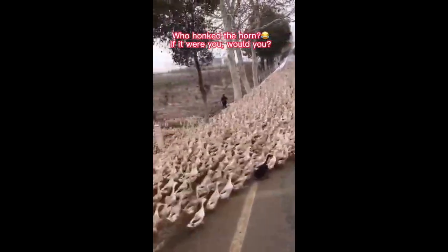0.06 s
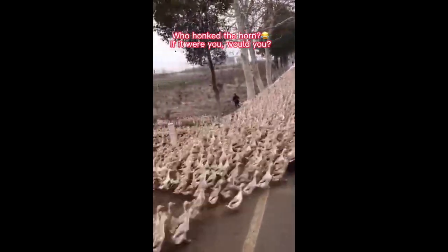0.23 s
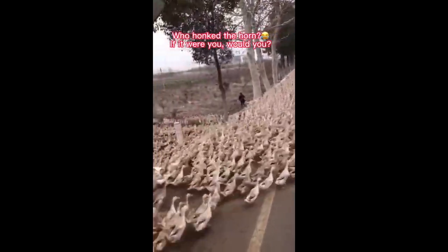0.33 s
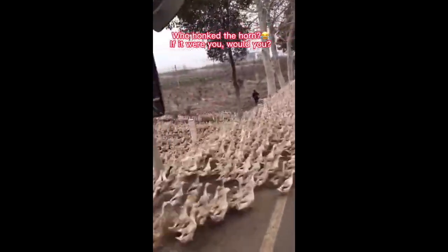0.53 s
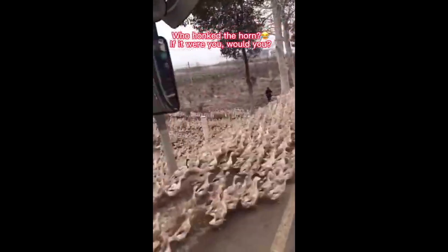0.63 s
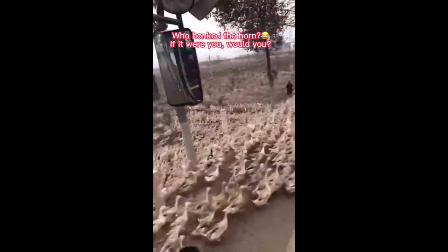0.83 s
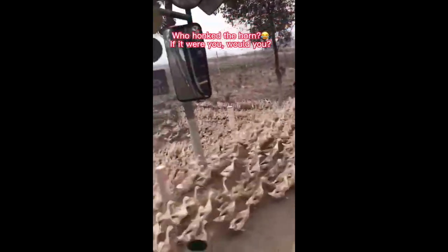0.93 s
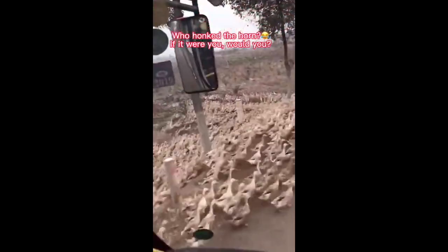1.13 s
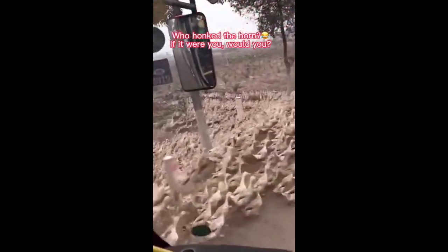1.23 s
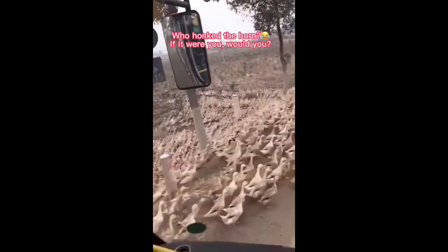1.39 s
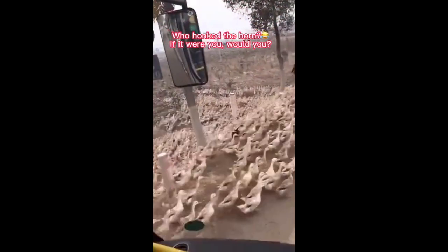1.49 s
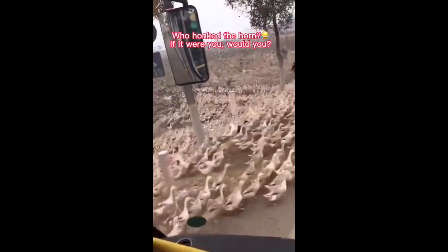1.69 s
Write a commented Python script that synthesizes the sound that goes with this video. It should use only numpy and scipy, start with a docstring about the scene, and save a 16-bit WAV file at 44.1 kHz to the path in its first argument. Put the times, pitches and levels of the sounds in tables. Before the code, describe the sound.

A truck's two-tone horn blasts once, loud and rasping, heard from the cab over quiet engine rumble. Its chord echoes from trees and fields, fades, then the sound briefly drops out before low engine noise returns.

```python
"""Truck horn on a country road

From the cab, a truck's two-tone horn gives one blast: two stacks of rasping overtones, with hiss and rough bursts.
Trees and fields send the chord back for almost a second, each overtone fading in and out on its own.
Uneven engine orders and shaped road noise run underneath. Near the end the sound drops out briefly,
leaving a faint rumble, and returns without the echo, with the engine and road noise changed in colour."""
import sys
import numpy as np
from scipy import signal
from scipy.fft import rfft, irfft, next_fast_len
from scipy.io import wavfile

SR = 44100
rng = np.random.default_rng(int(sys.argv[2]) if len(sys.argv) > 2 else 0)


def inscribe(sig):
    """Save sig as 16-bit PCM at rate SR to the path in sys.argv[1].

    A 1-D sig is mono; a 2-D sig holds one channel per row.
    Samples are clipped to [-1, 1] before scaling.
    """
    pcm = np.round(np.clip(np.atleast_2d(sig).T, -1, 1) * 32767)
    wavfile.write(sys.argv[1], SR, pcm.astype(np.int16))


N = 77175
T = np.arange(N) / SR  # s
EDGE_HZ = 15650  # upper band limit

# Road and cab noise before and after the dropout: pitch_hz, relative level_db (per Hz)
ROAD_COLOUR = [(25, -5.5), (45, -2.5), (85, 3.5), (150, -2.5), (300, -8.5), (600, -16.5), (1200, -19.5),
               (2800, -27), (6000, -36), (7500, -52), (15000, -49.5)]
LATE_ROAD_COLOUR = [(25, -20.5), (50, -5.5), (90, -5.5), (190, -16.5), (300, -9), (530, -15), (800, -21.5),
                    (1400, -19), (2300, -25), (3000, -31.5), (6000, -39), (7500, -50.5), (15000, -64)]
# Road noise level up to the dropout: start_s, level_db
ROAD_LEVEL = [(0, -63.5), (.2, -61), (.7, -58.5), (.9, -56), (1.38, -58)]
LATE_ROAD_DB = -58

# Engine orders: multiple of the firing rate, level_db before the dropout ends, level_db after it
ENGINE_ORDERS = [(1, -57.5, -83), (2, -74, -57.5), (3, -73.5, -62), (4.3, -66.5, -66.5)]
# Overall engine level, added to every order: start_s, level_db
ENGINE_LEVEL = [(0, -17.5), (.65, -7.5), (.85, -3.5), (1.25, 4.5), (1.45, -12.5), (1.75, 2.5)]
FIRING_HZ = 30.8  # mean rate

# Air noise of the blast: pitch_hz, relative level_db (per Hz)
AIR_COLOUR = [(100, -14.5), (250, 5.5), (400, -7), (640, -6.5), (1100, 5), (2000, -1.5), (2700, -13.5),
              (3800, -8), (5600, -31), (7300, -28.5), (8500, -37), (15000, -44.5)]
AIR_DB, EARLY_AIR_DB = -59, 8.5  # EARLY_AIR_DB is added once, and once more until SETTLE_S

LOW_HZ, HIGH_HZ = 419.25, 498.35  # the two horns
LOW_DB, HIGH_DB = -28, -24  # base levels, to which the overtone tables add
# Overtones of each horn: multiple of its pitch, level_db
LOW_OVERTONES = [(1, -17), (2, -4), (3, -15.5), (4, 1.5), (5, -6.5), (6, -18.5), (7, -22.5), (8, -21),
                 (9, -21.5), (10, -29), (11, -22), (12, -27.5), (13, -32), (14, -38), (15, -35.5),
                 (16, -54.5), (17, -39.5), (18, -51)]
HIGH_OVERTONES = [(1, -6), (2, 1.5), (3, -7), (4, -6), (5, -21), (6, -21), (7, -20.5), (8, -20.5), (9, -24),
                  (10, -30), (11, -36), (12, -41), (13, -45.5), (14, -50), (15, -45)]
# Weak overtones above those: pitch_hz, level_db
TOP_OVERTONES = [(7900, -83.5), (9000, -76.5), (10300, -82.5), (11300, -91.5), (12800, -86.5),
                 (14200, -88.5), (15500, -99)]
TOP_UNEVEN_DB = 6  # random spread of their levels
# An overtone swells or sinks where its paths add or cancel: middle_s, half_length_s, pitch_hz, level_db
SWELLS = [(.23, 0.027, 419, 17), (0.532, 0.017, 419, 11.5), (1.157, 0.093, 419, 9),
          (0.647, 0.013, 838, -13), (1, 0.24, 838, 3), (.29, 0.057, 997, 3.5), (0.66, 0.025, 997, 3.5),
          (0.766, 0.024, 997, -10), (.845, 0.042, 997, 8), (1.154, 0.072, 997, -7.5),
          (1.8, 0.13, 1257, 13.5), (0.91, 0.0089, 1700, 2), (0.83, 0.0087, 960, 5),
          (1.04, 0.011, 1495, 6.5), (1.3, .09, 1800, 9), (0.978, 0.068, 1677, 7), (1.022, 0.16, 1677, -11),
          (1.28, .08, 710, 7), (.283, 0.011, 1993, -24.5), (1.1, 0.21, 2096, -13), (.255, 0.037, 2500, 11),
          (0.86, 0.045, 2500, 13.5), (0.95, 0.07, 3488, 6.5), (1.17, 0.25, 3488, 9.5),
          (1.2, 0.15, 5005, 10)]
SAME_OVERTONE_HZ = 30  # a swell acts on overtones closer than this
ON_S, OFF_S, SETTLE_S = 0.225, 0.528, 0.29  # middle of rise, of fall; both horns rasp more until SETTLE_S
ATTACK_S, RELEASE_S = 0.004, 0.0068  # width settings of the smooth steps
LOW_LAG_S, TREBLE_LAG_S_PER_KHZ = 0.0098, 0.0041
SCOOP_HZ, SCOOP_S = 3.2, 0.022  # pitch starts this far below, and settles with this time constant
WAVER_HZ, WAVER_RATE_HZ = 0.49, 27  # pitch tremble: scale and speed
RASP_DB, EARLY_RASP_DB, RASP_WIDTH_HZ = -26, -16, 45  # against each overtone

SLAP_DELAY_S = 0.071  # first reflection, from the roadside trees
# Its strength against the blast: pitch_hz, level_db
SLAP_COLOUR = [(420, -13.5), (500, -33), (1000, -25), (1500, -27), (1680, -11), (2100, -25), (2500, -3),
               (3200, -2), (4300, -18.5), (6000, -9), (9000, -9.5), (14000, -11.5)]
# Echo of each horn against its blast: start_s, level_db
LOW_ECHO = [(.25, -19.5), (.48, -7.5), (.57, 2.5), (0.651, -0.5), (.77, 0.5), (.86, -3.5), (0.941, 2.5),
            (1.001, -9.5), (1.07, -9), (1.16, -16.5), (1.26, -17.5), (1.38, -22)]
HIGH_ECHO = [(.25, -17), (.48, -1), (.56, -7), (0.621, -3), (.71, -3), (.77, -6.5), (.85, -9),
             (0.979, -8.5), (1.04, -10.5), (1.12, -16), (1.259, -18), (1.38, -25)]
# Colour of the echo: pitch_hz, level_db
ECHO_COLOUR = [(420, -6.5), (500, -15), (840, -10), (1000, -14.5), (1260, -6.5), (1500, -4.5), (1680, -9),
               (2050, -10), (2500, -13.5), (3000, -9), (3500, -5.5), (4500, -12), (6000, -2.5),
               (14000, -4.5)]
ECHO_DULLING_DB_PER_KHZ_S, DULL_FROM_HZ = 9, 2650
FADING_DB, DRIFT_RAD, FADING_HZ = 1.74, 0.31, 21  # depth scales at 1 kHz, and speed
SCATTER_DB, SCATTER_HZ = -10.5, 24

# Rough bursts as the horns catch, settle and let go: middle_s, half_length_s, level_db
BURSTS = [(0.241, 0.021, -40), (0.32, 0.014, -44.5), (0.54, .025, -52)]
# Their colour: pitch_hz, relative level_db (per Hz)
BURST_COLOUR = [(100, -12), (230, -1.5), (400, 0.5), (640, -2.5), (1100, -5.5), (1500, -7), (2500, -7.5),
                (4000, -22.5), (5500, -32.5), (7500, -29), (10000, -41), (15000, -46)]

GAP_FROM_S, GAP_TO_S, GAP_FADE_S, GAP_DB = 1.376, 1.467, 0.0095, -33  # GAP_DB: gain of the rumble left


def amp(db):
    """Decibels to gain."""
    return 10 ** (np.asarray(db) / 20)


def unit(x):
    """Scales to an rms of one."""
    return x / np.sqrt(np.mean(abs(x) ** 2) + 1e-20)


def curve(points):
    """Joins (s, value) points by straight lines."""
    return np.interp(T, *np.transpose(points))


def read(points, hz):
    """Reads a spectrum on a log-frequency axis."""
    pitch_hz, value = np.transpose(points)
    return np.interp(np.log(hz + 1), np.log(pitch_hz + 1), value)


def step(at_s, width_s):
    """Smooth rise from 0 to 1, halfway at at_s."""
    return 0.5 + 0.5 * np.tanh((T - at_s) / (2 * width_s))


def bump(middle_s, half_s):
    """Bell-shaped swell with a peak of 1."""
    return np.exp(-((T - middle_s) / half_s) ** 2)


def noise(colour):
    """Random noise of rms one, coloured by a spectrum table."""
    size = next_fast_len(N)
    gain = amp(read(colour, np.fft.rfftfreq(size, 1 / SR)))
    spectrum = rfft(rng.standard_normal(size)) * gain
    return unit(irfft(spectrum, size)[:N])


def wander(rate_hz):
    """Smooth complex chance of rms one, mostly slower than about twice rate_hz; both parts independent."""
    hz = np.fft.fftfreq(4096, 32 / SR)  # one point per 32 samples
    phase = 2j * np.pi * rng.random(len(hz))
    z = np.fft.ifft(np.exp(phase - 0.5 * (hz / rate_hz) ** 2))
    return unit(np.interp(np.arange(N) / 32, np.arange(len(z)), z))


def road():
    """Rumble and wash in the cab: broadband noise that changes colour after the dropout."""
    before = amp(curve(ROAD_LEVEL)) * noise(ROAD_COLOUR)
    after = amp(LATE_ROAD_DB) * noise(LATE_ROAD_COLOUR)
    return np.where(T < GAP_TO_S, before, after)


def engine():
    """Low, uneven orders of a slow-running engine, all following one wandering firing rate."""
    turns = np.cumsum(FIRING_HZ * (1 + 0.063 * wander(2.7).real)) / SR
    out = np.zeros(N)
    for order, before_db, after_db in ENGINE_ORDERS:
        level = amp(np.where(T < GAP_TO_S, before_db, after_db))
        unevenness = 1 + 0.16 * wander(8)
        tone = np.exp(2j * np.pi * (order * turns + rng.random()))
        out += level * (unevenness * tone).real
    return np.sqrt(2) * amp(curve(ENGINE_LEVEL)) * out


def air():
    """Hiss under the blast, strongest while the horns settle."""
    gate = step(ON_S - ATTACK_S, ATTACK_S) * (1 - step(OFF_S + RELEASE_S, RELEASE_S))
    level_db = AIR_DB + EARLY_AIR_DB * (2 - step(SETTLE_S, 0.015))
    return gate * amp(level_db) * noise(AIR_COLOUR)


def horn(pitch_hz, level_db, overtones, echo_level, lag_s):
    """A buzzing diaphragm and its flare: a stack of slightly rasping overtones, with their echoes."""
    scoop = SCOOP_HZ * np.exp(-np.maximum(T - ON_S, 0) / SCOOP_S)
    turns = np.cumsum(pitch_hz - scoop + WAVER_HZ * wander(WAVER_RATE_HZ).real) / SR
    rasp = amp(RASP_DB) + amp(EARLY_RASP_DB) * (1 - step(SETTLE_S, ATTACK_S))
    slap_end = step(OFF_S + SLAP_DELAY_S, RELEASE_S)
    slap_gate = step(ON_S + SLAP_DELAY_S, ATTACK_S) * (1 - slap_end)
    echo_db = curve(echo_level)
    out = np.zeros(N)
    for k in range(1, int(EDGE_HZ / pitch_hz) + 1):
        hz = k * pitch_hz
        if k <= len(overtones):
            db = level_db + overtones[k - 1][1]
        else:
            db = read(TOP_OVERTONES, hz) + TOP_UNEVEN_DB * rng.standard_normal()
        for middle_s, half_s, swell_hz, swell_db in SWELLS:
            if abs(swell_hz - hz) < SAME_OVERTONE_HZ:
                db = db + swell_db * bump(middle_s, half_s)
        # higher overtones start and stop later, up to 10 kHz
        late_s = lag_s + TREBLE_LAG_S_PER_KHZ * (min(hz / 1000, 10) - 1)
        blast = (1 - step(OFF_S + late_s, RELEASE_S)) * (1 + rasp * wander(RASP_WIDTH_HZ))
        slap = 1j * amp(read(SLAP_COLOUR, hz)) * slap_gate
        carrier = np.exp(2j * np.pi * (k * turns + rng.random()))
        overtone = (blast + slap + echo(hz, echo_db)) * carrier
        out += np.sqrt(2) * amp(db) * step(ON_S + late_s, ATTACK_S) * overtone.real
    return out


def echo(hz, level_db):
    """One overtone's return over many paths: short waves fade and drift more, and die sooner."""
    khz = hz / 1000
    slow = wander(FADING_HZ) * np.sqrt(min(khz, 5))
    dulling_db_per_s = ECHO_DULLING_DB_PER_KHZ_S * khz * max(1 - DULL_FROM_HZ / hz, 0)
    dulling_db = dulling_db_per_s * np.maximum(T - OFF_S, 0)
    gain = amp(level_db + read(ECHO_COLOUR, hz) - dulling_db + FADING_DB * slow.real)
    drift = np.exp(1j * DRIFT_RAD * slow.imag)
    return gain * drift * (1j + amp(SCATTER_DB) * wander(SCATTER_HZ))


def bursts():
    """Short swells of rough noise on the blast."""
    level = sum(amp(db) * bump(middle_s, half_s) for middle_s, half_s, db in BURSTS)
    return level * noise(BURST_COLOUR)


def scene():
    """Both horns over the engine and the road; the horns and their echo stop when the dropout ends."""
    low = horn(LOW_HZ, LOW_DB, LOW_OVERTONES, LOW_ECHO, LOW_LAG_S)
    high = horn(HIGH_HZ, HIGH_DB, HIGH_OVERTONES, HIGH_ECHO, 0)
    horns = (low + high) * (T < GAP_TO_S)
    return (road() + engine() + air() + horns + bursts())[None]


def record(dry):
    """The sound drops out briefly, leaving only a faint rumble; then the band limit."""
    gap = np.clip((T - GAP_FROM_S) / GAP_FADE_S, 0, 1) * (T < GAP_TO_S)  # fades out, returns at once
    low_pass = signal.butter(2, 200, fs=SR, output="sos")
    rumble = amp(GAP_DB) * signal.sosfilt(low_pass, dry)
    out = dry * (1 - gap) + rumble * gap
    band_limit = signal.firwin(511, EDGE_HZ, window=("kaiser", 9), fs=SR)
    return signal.oaconvolve(out, band_limit[None], "same")


dry = scene()
out = record(dry)
inscribe(out)
```